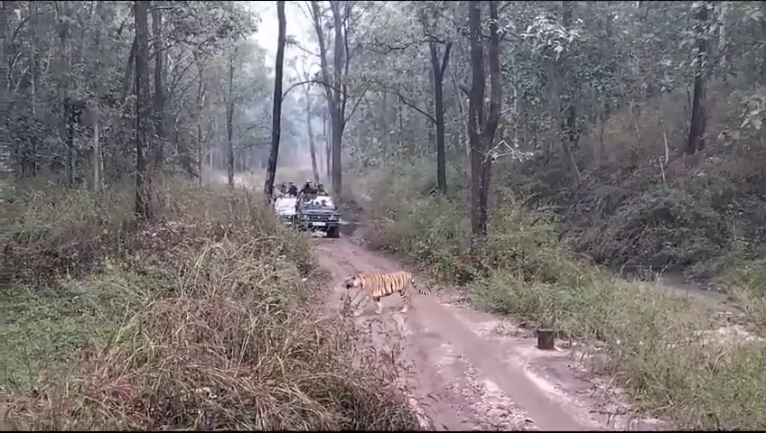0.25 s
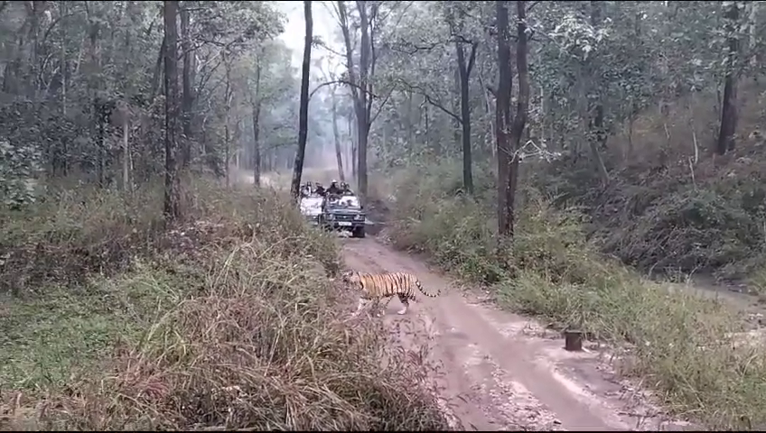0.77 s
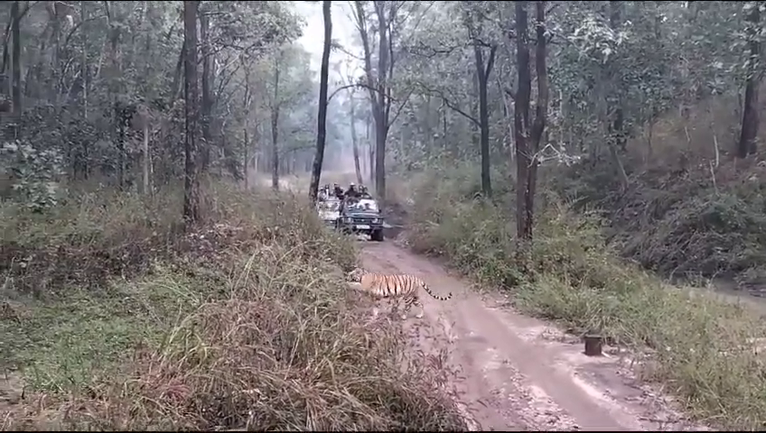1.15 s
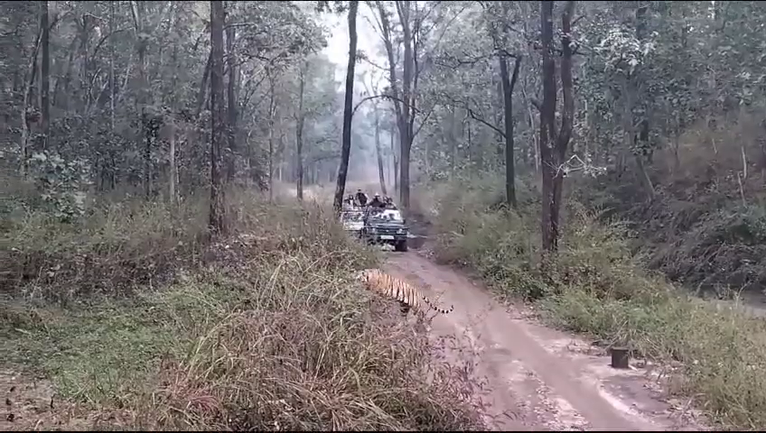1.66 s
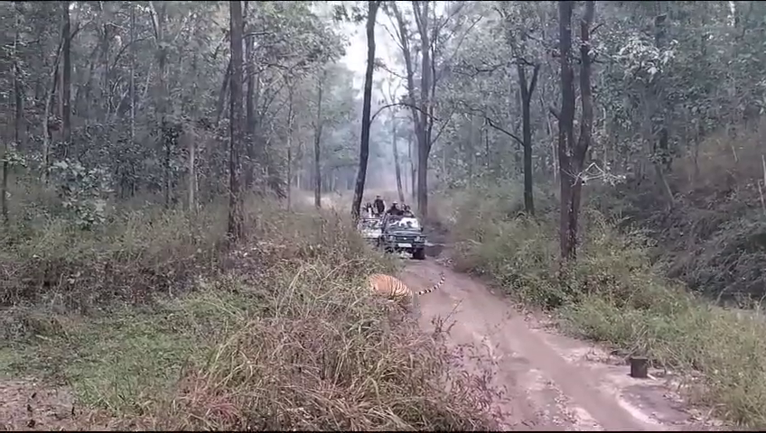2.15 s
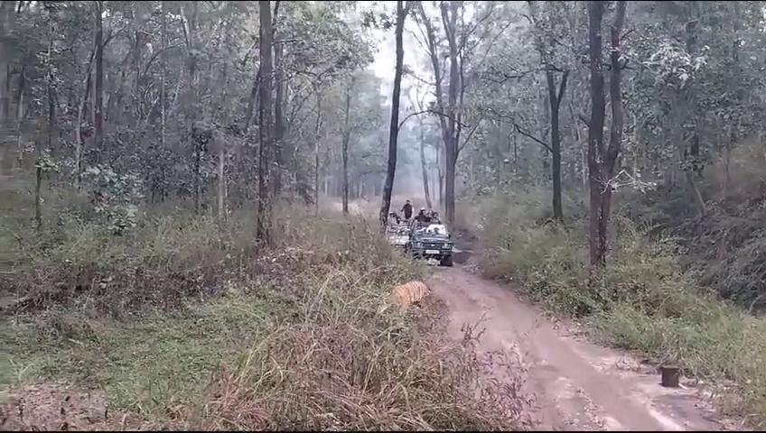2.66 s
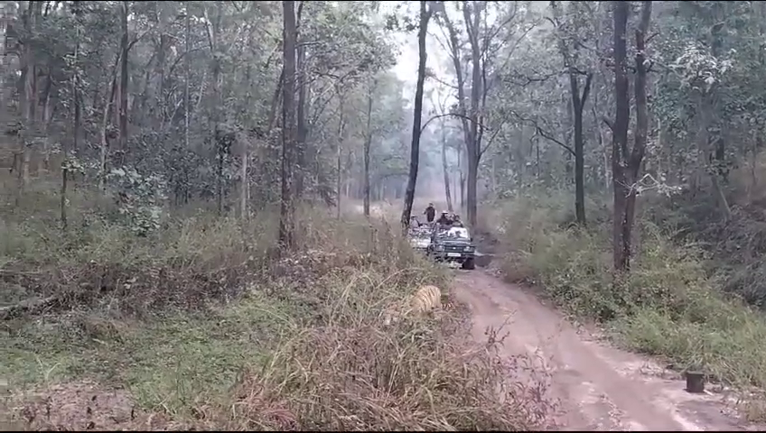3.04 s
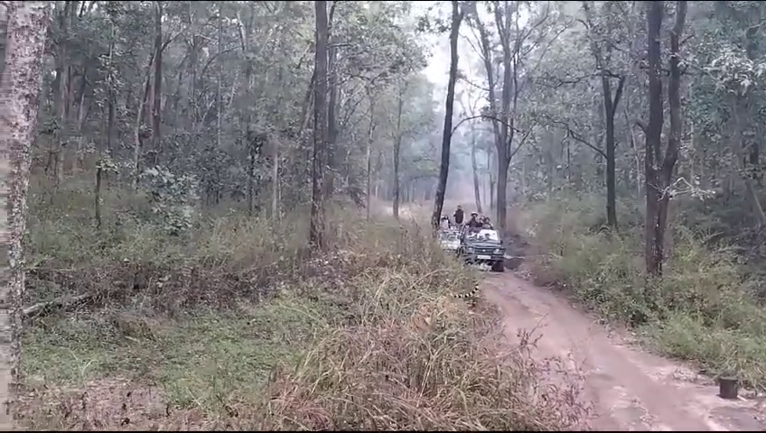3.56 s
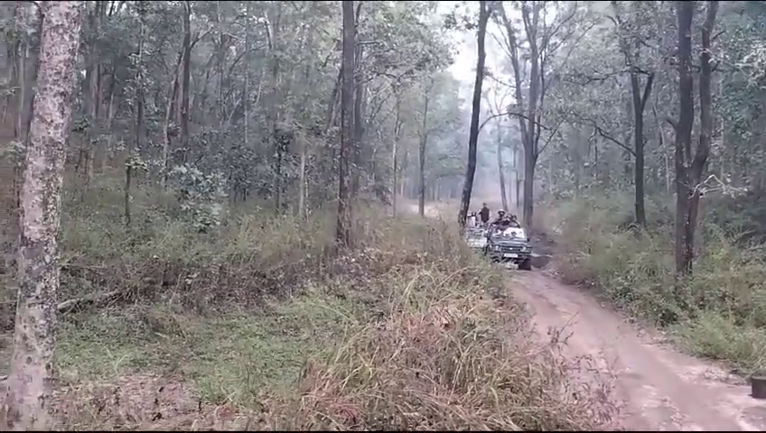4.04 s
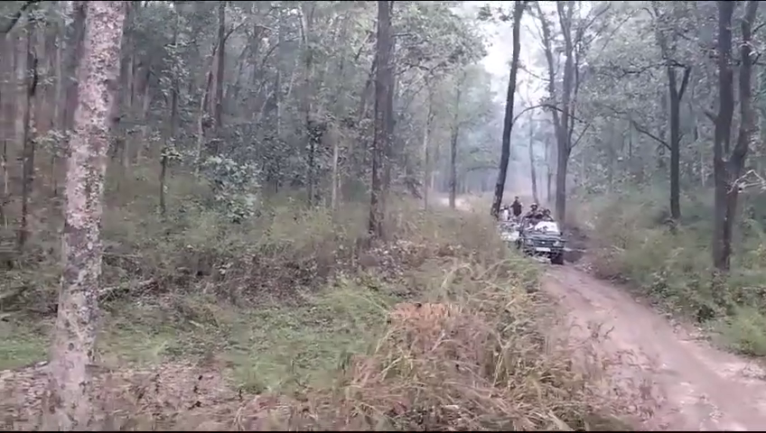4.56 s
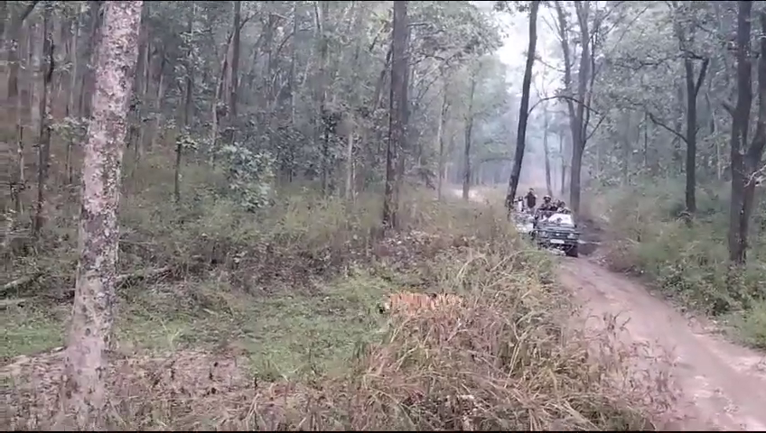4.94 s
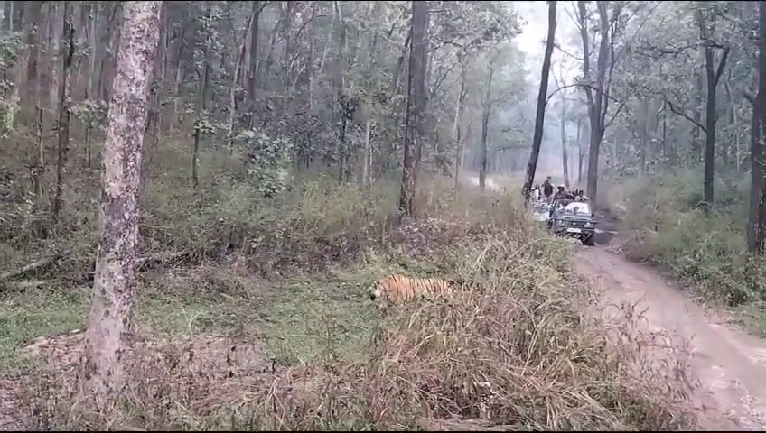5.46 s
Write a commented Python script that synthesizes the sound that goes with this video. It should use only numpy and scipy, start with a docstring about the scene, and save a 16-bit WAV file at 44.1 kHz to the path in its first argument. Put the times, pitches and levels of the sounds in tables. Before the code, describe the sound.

Quiet forest with faint high insects and brief bird chirps, broken by two loud, booming tiger calls that close into low growls and grunts.

```python
"""A thin high band of insects and a low swelling forest murmur run throughout, with quick bird chirps
at first and again between the roars. A tiger gives two long moaning roars ("aa-oo-oom").
Its slow vocal folds make the tones and a closing mouth shapes them: each roar booms just before
the lips close, then breaks into a growl that ends in a grunt. Insects, murmur and the tiger's breath
are mostly filtered noise, the chirps are gliding sine waves, and trees scatter chirps and roars."""
import sys
import numpy as np
from scipy import signal
from scipy.fft import rfft, irfft
from scipy.io import wavfile
from scipy.ndimage import uniform_filter1d, map_coordinates

SR = 44100
rng = np.random.default_rng(int(sys.argv[2]) if len(sys.argv) > 2 else 0)


def transcribe(signal):
    """Save signal, clipped to [-1, 1], as a 16-bit WAV file at the path in sys.argv[1]."""
    frames = np.atleast_2d(signal).T
    limited = np.clip(frames, -1, 1)
    pcm = np.round(limited * 32767).astype(np.int16)
    wavfile.write(sys.argv[1], SR, pcm)


N = 251370
TIME = np.arange(N) / SR
FREQS = np.fft.rfftfreq(N, 1 / SR)

# Insect chorus: (centre [Hz], width of a resonance applied twice [Hz], average level [dB])
INSECTS = [(3802, 414, -65), (4460, 690, -74), (7460, 380, -80), (11620, 70, -89)]
# Colour of the still forest air: (frequency [Hz], relative level per Hz [dB])
STILL_AIR = [(15, -43), (25, 3.5), (224, -5.5), (414, -13), (727, -5.5), (1060, -5.5), (1240, -21),
             (1760, -14.5), (2420, -25), (3250, -20), (3920, -2), (5260, -17.5), (7650, -15), (9220, -24),
             (14900, -27.5)]
# Colour of the low forest murmur: (frequency [Hz], relative level [dB])
MURMUR = [(35, -46), (60, -22), (104, -3.5), (171, -4), (277, 3.5), (350, -7), (435, -5), (549, -10.5),
          (889, -6.5), (1160, -19), (1390, -25), (1560, -16.5), (1910, -27.5), (2150, -19), (3200, -24),
          (4160, -52.5), (7040, -120)]
# Swells of the murmur: (loudest moment [s], half length [s], rise above the calm [dB])
SWELLS = [(0.177, 0.61, 13.5), (3.552, 0.59, 11.5)]
# Bird notes before the trees:
# (start [s], length [s], start pitch [Hz], middle pitch [Hz], end pitch [Hz], level [dB])
CHIRPS = [(0.015, 0.048, 6100, 5470, 4620, -51), (0.043, 0.03, 6110, 5670, 4800, -46.5),
          (0.063, 0.045, 5140, 4730, 4710, -49), (0.124, 0.044, 4700, 5100, 5060, -52.5),
          (0.216, 0.025, 5900, 6280, 6520, -48), (0.858, 0.052, 2550, 2910, 3180, -61),
          (0.93, 0.029, 3060, 3100, 3480, -62), (0.998, 0.04, 2010, 2340, 3100, -66),
          (1.096, 0.036, 5670, 5000, 4530, -68), (0.996, 0.22, 628.5, 630, 678, -66),
          (1.203, 0.13, 697, 677, 734, -62), (2.603, 0.025, 6147, 5970, 5250, -49.5),
          (2.619, 0.03, 5960, 5200, 4760, -48), (2.65, 0.04, 5160, 4617, 4626, -46),
          (2.686, 0.039, 4800, 5190, 5830, -48.5), (2.726, 0.021, 3600, 3540, 3510, -54.5),
          (2.75, 0.023, 5830, 6050, 6360, -55), (2.783, .025, 4760, 4950, 5200, -55),
          (3.144, 0.016, 3602, 3070, 2680, -58), (3.2, 0.04, 2872, 3088, 3110, -59),
          (4.433, .03, 5500, 5160, 4900, -66.5), (4.54, 0.013, 2650, 2690, 2750, -66.5)]
# The two roars: (start [s], lips close [s], end [s], base voice level [dB],
# base rasp level [dB], base hiss level [dB], second resonance with the mouth open [dB],
# third resonance [dB], change of the third once shut [dB], closing grunt [dB], attack time [s])
ROARS = [(1.448, 2.008, 2.51, -19.5, -40.5, -52, -7, -28.5, -12, 11.5, 0.089),
         (4.655, 5.325, 5.725, -19.5, -41.5, -49.5, -3, -26, -4.5, 12.5, 0.1)]
# Pitch of the vocal folds, one curve per roar: (time [s], pitch before a small wobble [Hz])
PITCH = [
    [(1.45, 91), (1.6, 116.9), (1.745, 130.6), (1.885, 135.5), (2.025, 150.9), (2.165, 144.7),
     (2.375, 128.1), (2.445, 109.4), (2.52, 95)],
    [(4.7, 99.05), (4.855, 123.5), (4.995, 132.4), (5.135, 133.8), (5.275, 139.1), (5.345, 146.3),
     (5.415, 137.9), (5.555, 125.7), (5.7, 103.9)],
]
# The mouth opens and closes, one curve per roar:
# (time [s], first resonance [Hz], second resonance [Hz], third resonance [Hz])
MOUTH = [
    [(1.48, 329, 670, 1930), (1.6, 378, 692, 2110), (1.68, 368.6, 742, 2100), (1.77, 395.5, 775, 2050),
     (1.82, 286, 650, 1980), (1.9, 293, 548, 1730), (2.02, 239, 517, 2270), (2.14, 167, 327, 2070),
     (2.43, 113, 254, 2210)],
    [(4.68, 440, 670, 1990), (4.78, 517, 760, 2270), (4.89, 424, 894, 2370), (4.97, 547, 850, 2170),
     (5.06, 362, 783, 2100), (5.14, 281, 660, 2020), (5.24, 283.4, 572, 2470), (5.31, 265, 529, 2340),
     (5.45, 158, 302, 2160), (5.62, 117, 263, 2210)],
]
# Colour of the lower, rasping air in the throat, one per roar: (frequency [Hz], relative level [dB])
RASP = [
    [(500, -1), (850, 0), (1040, -4), (1140, -5), (1240, -0.5), (1360, -12.5), (1530, -8.5), (1690, -15),
     (2000, -13), (2550, -11.5), (3600, -28.5), (4680, -53), (7920, -120)],
    [(500, -10), (850, -4.5), (1010, 0), (1080, -6.5), (1180, 1.5), (1350, -4), (2050, -13), (2260, -10),
     (2690, -17), (3000, -9.5), (3600, -41), (4680, -56), (7920, -120)],
]
# Colour of the higher, hissing air, one per roar: (frequency [Hz], relative level [dB])
HISS = [
    [(2000, -51.5), (3400, -7), (3800, -2.5), (4300, -3.5), (5720, 6), (6120, -6), (6630, 1), (7140, 4.5),
     (7600, 6), (8760, 2.5), (10300, -15.5), (14900, -18)],
    [(2000, -35), (3400, -2), (3660, -6), (4720, -3), (5150, 1), (5820, 0.5), (6800, -9), (7460, 3),
     (8660, 0.5), (10000, -15.5), (12500, -23), (14200, -27), (14900, -20)],
]

CALM_DB = -68  # murmur between its swells
SCATTER_FROM_HZ = 2840  # leaves scatter bird notes above this pitch the most
CLOSING_S = 0.035  # how gradually the lips close
# Voice level: it rises from this far down, sinks once the lips close, then dies away after the end
ONSET_DB, FALL_DB, RELEASE_DB_PER_S = 43.5, 22.5, 96
# The closing mouth tunes its first resonance to the second harmonic: a boom at a set time
BOOM_DB, BOOM_BEFORE_CLOSE_S, BOOM_WIDTH_S = 8, 0.1, 0.046
# A smaller swell where the first resonance meets the third harmonic; it needs time to ring fully
RING_DB, RING_REACH_HZ, RING_BUILD_S = 6, 6.7, 0.32
# A last push ends each call
GRUNT_BEFORE_END_S, GRUNT_WIDTH_S = 0.087, 0.041
# The second resonance weakens as it sinks below its open-mouth pitch
OPEN_HZ, SECOND_DB_PER_OCTAVE = 810, 12.5
# Upper resonances are turned down while others swell: dB per dB
SECOND_DUCK, RING_DUCK, THIRD_DUCK = 0.62, 1.3, 1.8
THIRD_FALL_DB = 7  # further gradual loss from closing to the end
# Narrow band in the hiss, from the widest mouth towards the shut one
WHISTLE_OPEN_HZ, WHISTLE_SHUT_HZ = 5460, 6260
# Roughness: open voice, extra at the onset, extra with the lips shut; the onset part settles quickly
ROUGH_CLEAR, ROUGH_ONSET, ROUGH_SHUT, SETTLE_S = 0.11, 0.74, 0.32, 0.076
# Strength of the half lines: open voice, extra as the lips close, extra with the lips shut
DOUBLING_CLEAR, DOUBLING_BREAK, DOUBLING_SHUT, BREAK_WIDTH_S = 0.11, 0.65, 0.32, 0.03
GROWL_DEPTH = 0.18  # with the lips shut, every other puff of air is the stronger: share 0-1


def undb(db):
    """Turn decibels into gain."""
    return 10 ** (np.asarray(db) / 20)


def unit(x):
    """Scale to an average (rms) level of 1."""
    return x / np.sqrt(np.mean(x ** 2))


def walk(rate):
    """Smooth random wander of spread 1 that changes about rate times a second."""
    noise = rfft(rng.standard_normal(N))
    return unit(irfft(noise * np.exp(-(FREQS / rate) ** 2), N))


def resonance(hz, centre, width):
    """Response of something that rings at one pitch; its gain is 1 at the centre."""
    return 1 / (1 + 1j * (hz ** 2 - centre ** 2) / (hz * width + 1e-9))


def insects():
    """Many far insects merge into narrow bands of noise whose level wavers slightly."""
    chorus = 0
    for hz, width, db in INSECTS:
        level = undb(db + 1.8 * walk(20))
        noise = rfft(rng.standard_normal(N))
        chorus = chorus + level * unit(irfft(noise * resonance(FREQS, hz, width) ** 2, N))
    return chorus


def colour(x, spectrum):
    """Filter by a spectrum of frequencies and levels, then scale to rms 1."""
    hz, db = np.transpose(spectrum)
    level_db = np.interp(np.log(FREQS + 1), np.log(hz), db, left=-120, right=-120)
    return unit(irfft(rfft(x) * undb(level_db), N))


def forest():
    """Still air, and a distant low murmur that swells and sinks."""
    still = undb(-63) * colour(rng.standard_normal(N), STILL_AIR)
    swell_db = CALM_DB + sum(db * np.exp(-((TIME - s) / half) ** 4) for s, half, db in SWELLS)
    murmur = colour(rng.standard_normal(N), MURMUR)
    return still + undb(swell_db + 0.21 * walk(8)) * murmur


def spread(source, side_db):
    """A sound from all round: one draw common to both ears, another opposite between them."""
    return source() + undb(side_db) * source() * np.array([[1], [-1]])


def birds():
    """Short gliding whistles; the higher the pitch, the more it wavers."""
    out, waver = np.zeros(N), walk(397)
    for start, length, *pitches, db in CHIRPS:
        span = (TIME > start) & (TIME < start + length)
        progress = (TIME[span] - start) / length
        hz = np.interp(progress, [0, .5, 1], pitches)
        hz = hz * (1 + .016 * (hz / 5500) ** 2 * waver[span])
        loudness = undb(db) * np.sqrt(np.sin(np.pi * progress))
        out[span] += loudness * np.sin(2 * np.pi * np.cumsum(hz) / SR)
    return out


def trees(x, wet_db, t60_low, t60_high, side_db, build_s):
    """Direct sound plus scatter from trunks and leaves; bass and treble die in their own t60 seconds."""
    t = TIME[:2 * SR]
    tails = rng.standard_normal((2, len(t))) * (1 - np.exp(-t / build_s))
    low = signal.sosfilt(signal.butter(2, 1200, fs=SR, output="sos"), tails)
    high = tails - low
    tails = low * undb(-60 * t / t60_low) + high * undb(-60 * t / t60_high)
    mid, side = (signal.fftconvolve(x, h / np.linalg.norm(h))[:N] for h in tails)
    return x + undb(wet_db) * (mid + undb(side_db) * side * np.array([[1], [-1]]))


def birdsong():
    """High trills smear among the leaves; lower whistles arrive clearer."""
    song = birds()
    low = signal.sosfiltfilt(signal.butter(4, SCATTER_FROM_HZ, fs=SR, output="sos"), song)
    trills = trees(song - low, wet_db=3, t60_low=.6, t60_high=.9, side_db=-12.0, build_s=0.0045)
    whistles = trees(low, wet_db=1, t60_low=0.92, t60_high=0.64, side_db=-3.5, build_s=0.0056)
    return undb(-1.3) * trills + undb(-2.5) * whistles


def curves(table):
    """Draw each column of a table as a curve in time."""
    s, *columns = np.transpose(table)
    return [np.interp(TIME, s, c) for c in columns]


def bump(t, centre, width):
    """A smooth rise to 1 and fall."""
    return np.exp(-((t - centre) / width) ** 2)


def lips_shut(close):
    """How far the lips are closed, gliding from 0 to 1."""
    return (1 + np.tanh((TIME - close) / CLOSING_S)) / 2


def envelope(start, close, end, depth_db, attack_s, fall_db, bend):
    """Level in dB: attack, hold while the mouth is open, fall once the lips close, release."""
    attack = depth_db * np.exp(-np.maximum(TIME - start, 0) / attack_s)
    fall = fall_db * np.clip((TIME - close) / (end - close), 0, 1) ** bend
    return -attack - fall - RELEASE_DB_PER_S * np.maximum(TIME - end, 0)


def air(spectrum, sway):
    """Rushing air: noise whose resonances slide as the throat flexes."""
    place = np.cumsum(1 + sway * walk(8.1))  # reading faster or slower shifts the pitch
    return map_coordinates(colour(rng.standard_normal(N), spectrum), [place], order=5, mode="wrap")


def flutter(t, rate):
    """Quick smooth chance in the size and phase of one tone."""
    knots = rng.standard_normal((2, SR // 20))
    real, imag = (map_coordinates(row, [t * rate], order=3, mode="wrap") for row in knots)
    return real + 1j * imag


def throat(hz, first, second, second_db):
    """Two mouth resonances sink and narrow as it closes, over broad throat and chest tones."""
    lips_width = 35 + first ** 2 / 2000
    mouth = abs(resonance(hz, first, lips_width)) ** 2
    mouth = mouth + undb(second_db) * abs(resonance(hz, second, .15 * second)) ** 2
    pharynx = undb(-8.5) * np.minimum(1, first / 255) ** 2 * abs(resonance(hz, 244, 88)) ** 2
    closed = 1 / (1 + np.exp((first - 260) / 15))
    # with the lips shut the chest carries the fundamental
    chest = undb(-11.0) * closed * abs(resonance(hz, 100.0, 68)) ** 2
    brightness = (first / 2400) ** 2 * abs(resonance(hz, 750, 900)) ** 2
    valley = 1 / (1 + (hz / 1200) ** 8)  # little passes far above 1200 Hz
    return (mouth + pharynx + chest + brightness) * valley


def folds(t, phase, pitch, first, second, second_db, third, third_db, doubling, rough, count=44):
    """Harmonics, half lines from strong-weak cycles, and rough flutter, shaped by the throat."""
    out, power = 0, 0
    for k in np.arange(2, count) / 2:
        hz = k * pitch
        gain = throat(hz, first, second, second_db)
        gain = gain + undb(third_db) * abs(resonance(hz, third, 400)) ** 3
        shake = np.minimum(rough * (.15 + k / 4), .6)
        # flutter takes its power from the steady line
        size = (doubling if k % 1 else 1) * np.sqrt(1 - 2 * shake ** 2)
        # each resonance rings on after the pulse
        lag = -np.pi * (np.tanh(4 * (hz / first - 1)) + np.tanh(4 * (hz / second - 1))) / 2
        turn = np.exp(1j * (2 * np.pi * k * phase + lag))
        out = out + gain * np.real((size + shake * flutter(t, rate=90)) * turn)
        power = power + gain ** 2 * (size ** 2 + 2 * shake ** 2) / 2
    return out / np.sqrt(power)  # even level, so the voice curve sets the loudness


def voice(row, pitch, phase, mouth, span):
    """Rough at first, clear while open; booms as the mouth narrows, breaks as it shuts, then grunts."""
    start, close, end, voice_db, _, _, second_db, third_db, third_shut_db, grunt_db, attack_s = row
    first, second, third = curves(mouth)
    shut = lips_shut(close)
    boom_db = BOOM_DB * bump(TIME, close - BOOM_BEFORE_CLOSE_S, BOOM_WIDTH_S)
    detune = first - 3 * pitch
    # a quick crossing has no time to ring up
    tuned = uniform_filter1d(bump(detune, 0, RING_REACH_HZ), size=SR // 18)
    ring_db = RING_DB * tuned * np.clip((TIME - start) / RING_BUILD_S, 0, 1) ** 2
    grunt_db = grunt_db * bump(TIME, end - GRUNT_BEFORE_END_S, GRUNT_WIDTH_S)

    voice_db = voice_db + envelope(start, close, end, ONSET_DB, attack_s, FALL_DB, bend=0.85)
    voice_db = voice_db + boom_db + ring_db + grunt_db
    second_db = second_db + SECOND_DB_PER_OCTAVE * np.log2(second / OPEN_HZ)
    second_db = second_db - SECOND_DUCK * (boom_db + grunt_db) - RING_DUCK * ring_db
    third_db = third_db - THIRD_DUCK * boom_db + third_shut_db * shut
    third_db = third_db - THIRD_FALL_DB * np.clip((TIME - close) / (end - close), 0, 1)

    slack = shut * undb(-grunt_db / 2)  # the last push steadies the folds
    rough = ROUGH_CLEAR + ROUGH_ONSET * bump(TIME, start, SETTLE_S) + ROUGH_SHUT * slack
    doubling = DOUBLING_CLEAR + DOUBLING_BREAK * bump(TIME, close, BREAK_WIDTH_S)
    doubling = np.minimum(doubling + DOUBLING_SHUT * slack, 1)
    controls = (TIME, phase, pitch, first, second, second_db, third, third_db, doubling, rough)
    return undb(voice_db[span]) * folds(*(c[span] for c in controls))


def roar(row, pitch_curve, mouth, rasp, hiss):
    """One call: the voice, and air that rasps and hisses in puffs at each opening of the folds."""
    start, close, end, _, rasp_db, hiss_db, *_ = row
    pitch = curves(pitch_curve)[0] * (1 + 0.0061 * walk(45))
    phase = np.cumsum(pitch) / SR  # counted in cycles of the folds
    rasp_db = rasp_db + 1.5 + envelope(start, close, end, depth_db=40.5, attack_s=0.13, fall_db=19, bend=1.66)
    hiss_db = hiss_db + 0.5 + envelope(start, close, end, depth_db=32.5, attack_s=0.14, fall_db=24, bend=0.91)
    puffs = unit(1 + np.exp(-(phase % 1) / 0.35)) * undb(1.74 * walk(33))
    puffs = puffs * (1 + GROWL_DEPTH * lips_shut(close) * np.cos(np.pi * phase))
    # a narrow band of the hiss glides with the shape of the mouth
    second = curves(mouth)[1]
    openness = (second / second.max()) ** 4
    whistle_hz = WHISTLE_SHUT_HZ + (WHISTLE_OPEN_HZ - WHISTLE_SHUT_HZ) * openness
    whistle_hz = whistle_hz + 150 * walk(200)
    glide = walk(300) * np.sin(2 * np.pi * np.cumsum(whistle_hz) / SR)
    rasping = undb(rasp_db) * air(rasp, sway=0.028)
    hissing = undb(hiss_db) * (air(hiss, sway=.02) + undb(-2.5) * glide)
    call = puffs * (rasping + hissing)
    span = (TIME > start) & (TIME < end + .3)
    call[span] += voice(row, pitch, phase, mouth, span)
    return call * np.clip((TIME - start) / .02, 0, 1)


def tiger_among_trees():
    """Both roars with close scatter, plus a slower, fainter echo from far trunks."""
    tiger = sum(roar(*call) for call in zip(ROARS, PITCH, MOUTH, RASP, HISS))
    far_trunks = trees(tiger, wet_db=-23, t60_low=2.135, t60_high=1.08, side_db=-14, build_s=0.11) - tiger
    near = trees(tiger, wet_db=-8.0, t60_low=0.72, t60_high=0.88, side_db=-7.5, build_s=0.0099)
    return near + far_trunks


def scene():
    """Forest and insects all round, birds deep among the trees, the tiger; all slightly to the left."""
    around = spread(insects, side_db=-12.5) + spread(forest, side_db=-6)
    left_db = 0.48
    return (around + birdsong() + tiger_among_trees()) * undb([[left_db], [-left_db]])


def record(dry):
    """The sound is narrow in the bass and above 10 kHz, with thinned deep bass and no top above 15 kHz."""
    mid, side = dry.mean(axis=0), (dry[0] - dry[1]) / 2
    side = signal.sosfilt(signal.butter(1, 110, "high", fs=SR, output="sos"), side)
    side = signal.sosfiltfilt(signal.butter(4, 10000, fs=SR, output="sos"), side)
    ears = np.array([mid + side, mid - side])
    thin = signal.sosfilt(signal.butter(2, 40, "high", fs=SR, output="sos"), ears)
    return signal.sosfilt(signal.ellip(10, .2, 70, 15100, fs=SR, output="sos"), thin)


dry = scene()
out = record(dry)
transcribe(out)
```